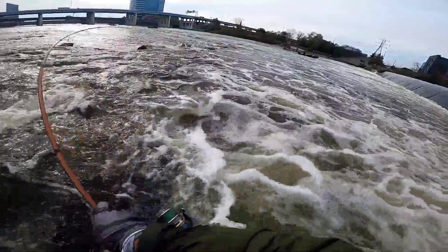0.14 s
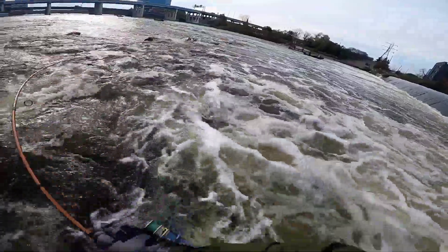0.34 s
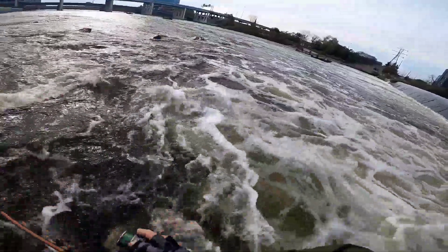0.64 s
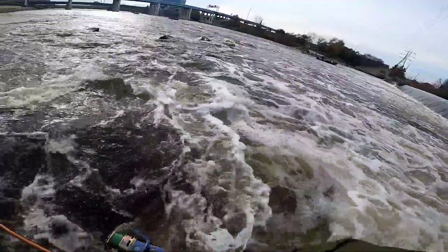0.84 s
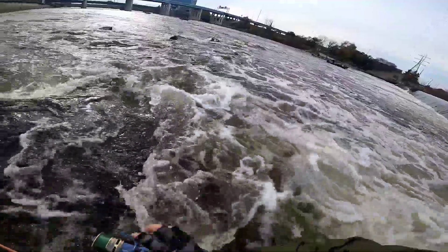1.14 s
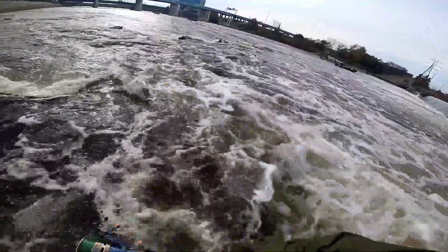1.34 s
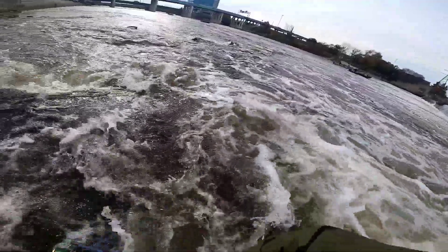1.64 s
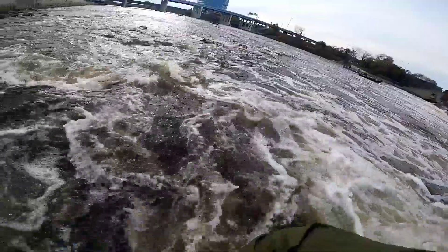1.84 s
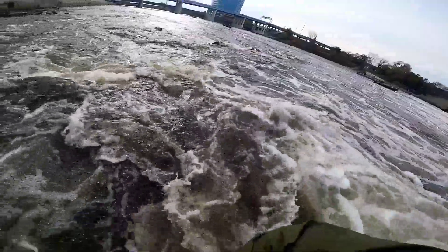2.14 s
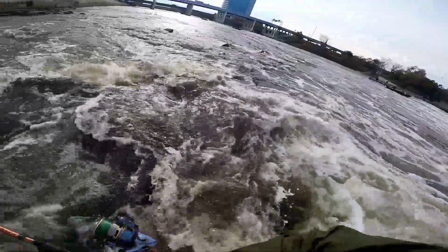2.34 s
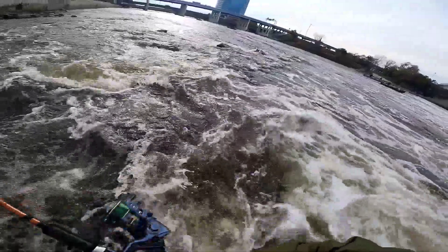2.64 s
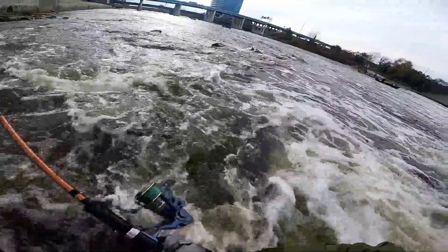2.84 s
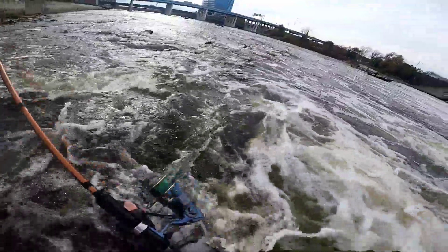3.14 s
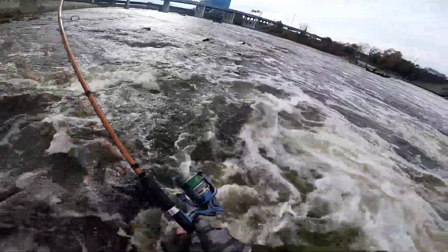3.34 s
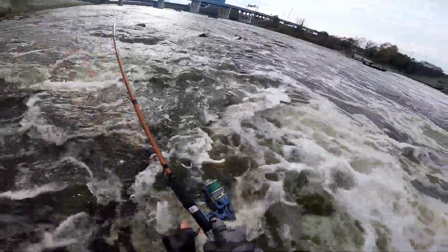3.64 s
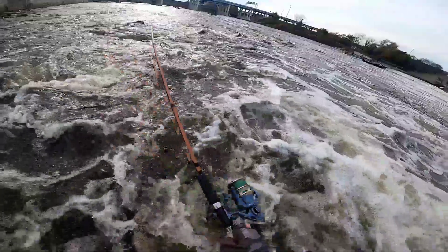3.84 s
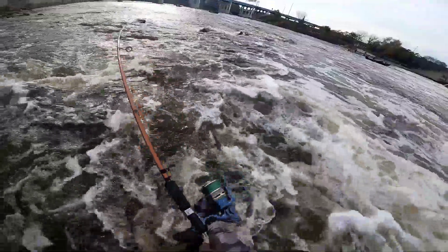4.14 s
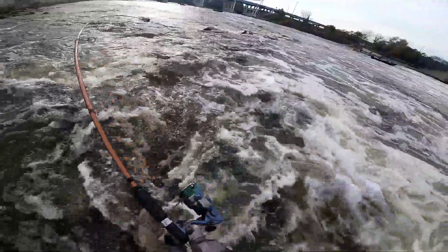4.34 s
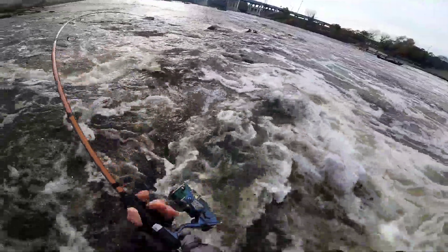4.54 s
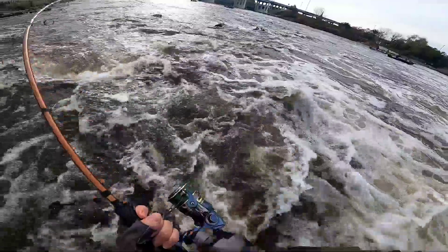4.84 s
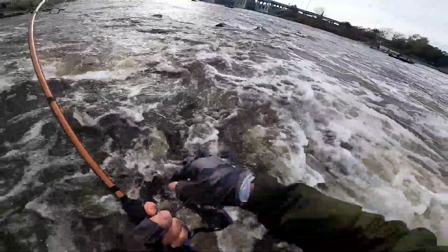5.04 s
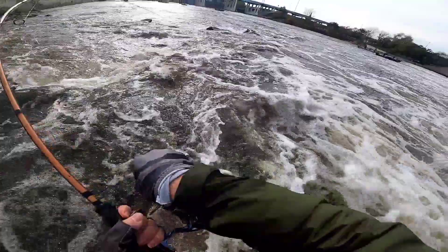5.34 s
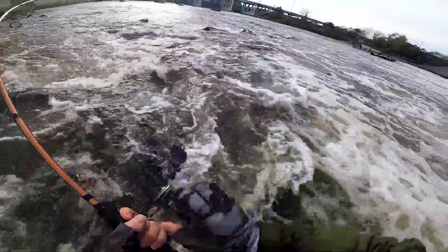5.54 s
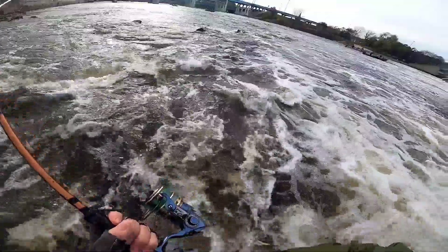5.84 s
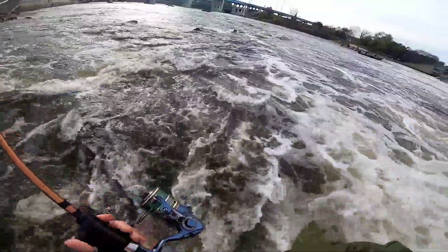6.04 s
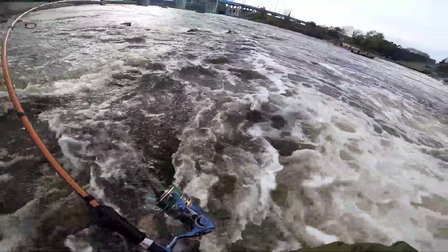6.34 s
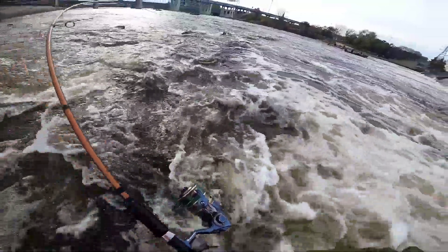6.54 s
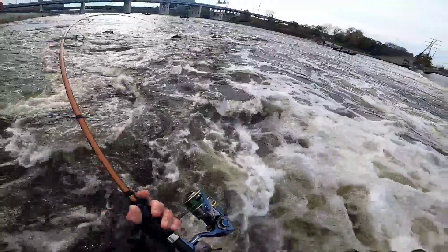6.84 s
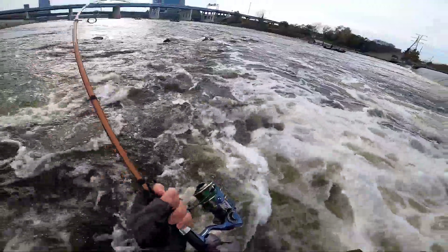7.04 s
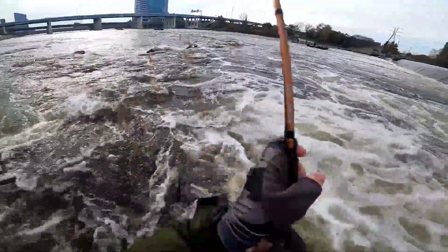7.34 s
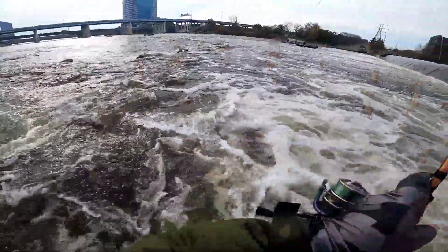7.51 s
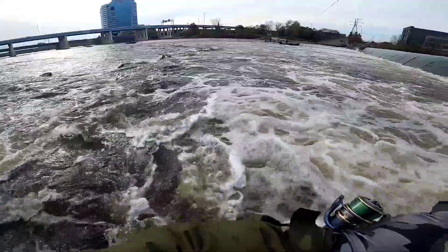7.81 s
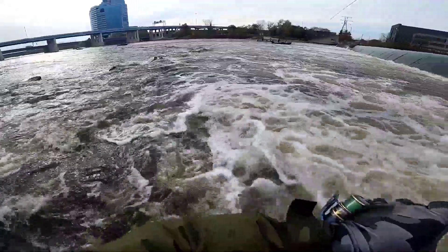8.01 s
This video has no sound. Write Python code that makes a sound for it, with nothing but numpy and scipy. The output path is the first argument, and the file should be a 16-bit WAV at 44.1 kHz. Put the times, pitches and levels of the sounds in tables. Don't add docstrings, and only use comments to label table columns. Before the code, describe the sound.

From the start, whitewater below a low dam roars continuously at a few metres: a dense mid-range rush with a gurgling body, bubbly foam fizz and only faint, dull-edged top treble, wide across two small chest-worn microphone ports. Deep, soft wind shoves bump the housing in the first second. From 1.1 to 1.7 s a cluster of small wet splashes pops close to the feet as the churn swells, then sinks around 2 s; another pop comes at 2.3 s. Between 2.4 and 4.1 s the hardest gusts strike, low thumps and quick fluttering flaps, strongest near 3.5 and 4.0 s, and the river ducks slightly after them. A splash lands at 4.0 s. From 4.2 s the wind drops and the water recovers, surging mildly near 4.8 s. Weaker shoves return around 6.5 to 7.6 s, with tiny splashes at 6.9 and 7.8 s; the rush continues to the end at about 8 s.

```python
import sys
import numpy as np
from scipy import signal
from scipy.fft import rfft, irfft, next_fast_len
from scipy.io import wavfile
from scipy.ndimage import uniform_filter1d, map_coordinates

SR = 44100
rng = np.random.default_rng(int(sys.argv[2]) if len(sys.argv) > 2 else 0)


def volts_from_decibels(level):
    exponent = np.asarray(level, float) / 20
    return 10 ** exponent


def master_out(mix):
    frames = np.transpose(np.atleast_2d(mix))
    ceiling = np.clip(frames, -1, 1)
    pcm = np.round(ceiling * 32767).astype(np.int16)
    wavfile.write(sys.argv[1], SR, pcm)


N = 360297
HZ = np.fft.rfftfreq(next_fast_len(N + 8192), 1 / SR)

# [t/s, level over the usual flow/dB]
SURGE = [(0, -.5), (.4, 0.3), (.8, -1.5), (1.2, 0.9), (1.55, 1.5), (2.1, -1), (2.45, 0.6), (2.95, -1),
         (3.3, -1.5), (3.6, .5), (4.2, -.8), (4.75, 1), (5.1, 0), (6.05, 0.3), (6.45, -0.1), (6.75, 0.3),
         (7.45, -0.3), (8.17, 0)]
# [f/Hz, density/dB]
LEFT_LOW = [(90, 3.5), (110, 0.6), (190, 0.5), (520, -7.5), (820, -11), (900, -6), (1210, 1.9), (1290, 2.1),
            (1810, -6.5), (1960, -13.5), (2170, -18.5), (2390, -14.5)]
RIGHT_LOW = [(90, -2), (110, -1), (190, -2.5), (280, -5), (620, -13.5), (840, -19.5), (930, -12.5),
             (1140, -8), (1340, -1.5), (1660, -6.5), (1920, -12.5), (2390, -32)]
# [f/Hz, density/dB]
LEFT_BRIGHT = [(1920, -13), (2170, -18), (2560, -11.5), (2860, -15), (3080, -10), (3330, -10.8),
               (3550, -14.5), (3960, -9.5), (4310, -21), (4910, -20.5), (5150, -22), (6300, -32),
               (7800, -31), (8980, -46.5)]
RIGHT_BRIGHT = [(1920, -16.5), (2800, -21.5), (3080, -15.5), (3570, -17), (3810, -22), (4350, -16.5),
                (5100, -16.5), (5320, -21.5), (5620, -22), (6830, -34), (7520, -45.5), (8200, -56),
                (8310, -56), (8790, -57)]
# [f/Hz, density/dB]
LEFT_TOP = [(8010, 9), (9020, -2), (11180, -1), (12230, 1), (13000, -5.5), (13600, -14), (15000, -17)]
RIGHT_TOP = [(8010, -11), (10230, -9), (11480, -22), (12170, -16.5), (13260, -14), (15000, -18)]
# [f/Hz, likeness/0-1]
ALIKE_LOW = [(90, .995), (350, .98), (690, .95), (840, .7), (970, .87), (1290, .85), (1400, .72),
             (1700, .88), (1980, .75), (2220, .86), (2390, .78)]
ALIKE_BRIGHT = [(1980, .78), (2580, .83), (2860, .5), (3060, .82), (3400, .82), (3620, .65), (3900, .78),
                (4500, .05), (4950, .6), (5450, .35), (5940, .55), (6160, .03), (6780, .54), (8100, .08)]
# [f/Hz, phase/rad]
LEAD = [(110, .05), (600, .3), (1100, .08), (1680, .6), (2240, 2.4), (2450, 2.0), (2750, 1.9), (2950, .75),
        (3750, 1.9), (3950, 1.55), (4400, 2.5), (6100, 3.4), (6250, .7), (7170, -1.1)]
# [t/s, level/dB]
GUST = [(0, -27), (.33, -36.5), (.7, -30.5), (1.5, -37), (1.9, -29.5), (2.3, -30), (2.72, -24), (3.4, -24),
        (3.68, -29), (3.93, -29), (4.25, -36.5), (4.62, -29.5), (4.87, -38), (5.2, -32.5), (6.2, -33.5),
        (6.75, -35), (7.72, -29), (7.95, -35.5)]
# [t/s, peak level/dB, length/s]
BUFFETS = [(0.16, -23.7, 0.07), (0.48, -27, 0.092), (0.568, -22, 0.065), (0.858, -24.5, 0.07),
           (1.15, -29, 0.093), (1.405, -30, 0.042), (2.043, -27, 0.082), (2.177, -24.5, 0.11),
           (2.413, -19.5, 0.067), (2.53, -33, 0.33), (2.653, -17.9, 0.055), (2.905, -20.0, 0.038),
           (2.998, -24.5, 0.053), (3.17, -32, 0.18), (3.47, -21, 0.05), (3.508, -16.5, 0.081),
           (3.612, -18.5, 0.095), (3.74, -18, 0.036), (3.796, -19, 0.042), (3.855, -20, 0.091),
           (4.007, -17, 0.045), (4.059, -16, 0.066), (4.528, -26, 0.087), (5.076, -29.5, 0.12),
           (6.477, -26.5, 0.09), (6.956, -29, 0.05), (7.07, -24, 0.033), (7.304, -24, 0.055),
           (7.56, -25.5, 0.062), (8.092, -25.5, 0.16)]
# [t/s, peak level/dB, length/s]
FLAPS = [(0.58, -35, 0.071), (0.98, -36.5, 0.08), (1.894, -37, 0.055), (2.39, -34, 0.11), (2.758, -38, 0.1),
         (3.1, -31.2, 0.075), (3.56, -44, 0.05), (3.73, -28, 0.036), (4.052, -27, 0.031),
         (4.495, -40, 0.039), (4.953, -34.5, 0.059), (5.045, -45, 0.052), (6.46, -31.9, 0.064),
         (7.497, -39, 0.05)]
# [f/Hz, density/dB]
BUFFET_COLOUR = [(3, -36), (6, -1), (22, -1), (34, 0), (48, -8), (60, -19.5), (80, -40), (200, -97)]
FLUTTER_COLOUR = [(30, -49), (55, 2), (65, 0), (80, -10), (100, -11.5), (125, -21), (250, -85)]
# [t/s, peak level/dB, centre f/Hz]
POPS = [(1.108, -30, 3140), (1.206, -33, 3110), (1.350, -24, 3500), (1.419, -29, 3110), (1.462, -29, 3850),
        (1.569, -27, 3700), (1.584, -28, 3050), (1.670, -29, 3350), (2.314, -31, 3130), (4.033, -27, 3010),
        (6.948, -32, 3900), (7.788, -33, 3830), (7.807, -31, 3140)]

ROAR_DB, RUSH_DB, FIZZ_DB, MIST_DB = -38, -39, -45, -76.6
ROAR_FOLLOWS, RUSH_FOLLOWS, FIZZ_FOLLOWS, MIST_FOLLOWS = .3, 0.69, 1.4, .9
FLUTTER_DB, FLUTTER_FOLLOWS = -43, .1
DUCK_FROM_DB, DUCK_RATIO = -19, 1.47
DUCK_DELAY_S, DUCK_ATTACK_S, DUCK_RELEASE_S = 0.06, 0.081, 0.36


def unit(x):
    return x / np.sqrt(np.mean(np.atleast_2d(x).mean(0) ** 2) + 1e-20)


def along(points):
    f, v = np.transpose(points)
    return np.interp(np.log(HZ + 1), np.log(f + 1), v)


def curves(rows):
    s, *cols = np.transpose(rows)
    return [np.interp(np.arange(N) / SR, s, c) for c in cols]


def filtered(x, response):
    m = 2 * len(HZ) - 2
    return irfft(rfft(x, m) * response, m)[..., :N]


def above(edge_hz, order=6):
    return 1 - 1 / (1 + (HZ / edge_hz) ** (2 * order))


def band(low_hz, high_hz, low_order=6, high_order=6):
    return np.sqrt(above(low_hz, low_order) * (1 - above(high_hz, high_order)))


def churn(patchy_db):
    z = signal.stft(rng.standard_normal((2, N + 512)), nperseg=512)[2]
    field = uniform_filter1d(rng.standard_normal(z.shape[1:]), size=12, axis=0)
    field = uniform_filter1d(field, size=7, axis=1)
    x = signal.istft(z * volts_from_decibels(patchy_db * field / field.std()), nperseg=512)[1][:, :N]
    return x / x.std()


def bubble(hz, cycles, length=256):
    u = np.arange(length) / SR * hz[:, None] / cycles
    ring = np.sin(2 * np.pi * cycles * (u + 0.078 * u ** 2))
    return ring * np.exp(-2.2 * u) * (1 - np.exp(-12 * u))


def scatter(starts, rows):
    at = starts.astype(int)[:, None] + np.arange(rows.shape[1])
    return np.bincount(at.ravel(), rows.ravel(), N + rows.shape[1])[:N]


def foam(low_hz, high_hz, cycles, spread_db, count):
    when, pitch, size = rng.random((2 * count, 3)).T
    rows = bubble(low_hz * (high_hz / low_hz) ** pitch, cycles, length=430)
    rows = rows * volts_from_decibels(-spread_db * np.log(size + 1e-4))[:, None]
    return np.array([unit(scatter(when[k::2] * (N - 1), rows[k::2])) for k in range(2)])


def spatter(depth_db, rate):
    knots = rng.standard_normal(int(N * rate / SR) + 4)
    return volts_from_decibels(depth_db * map_coordinates(knots, [np.arange(N) * rate / SR]))


def ports(pair, left, right, alike):
    turn = np.arccos(np.clip(along(alike), 0, 1)) / 2
    shared, apart = filtered(pair, np.array([np.cos(turn), np.sin(turn)]))
    lag = np.exp(.5j * along(LEAD))
    colours = np.array([volts_from_decibels(along(left)) / lag, volts_from_decibels(along(right)) * lag])
    return filtered(np.array([shared + apart, shared - apart]), colours)


def river():
    surge_db, = curves(SURGE)
    gurgle = volts_from_decibels(-18.5) * foam(706, 2107, cycles=11.2, spread_db=1.5, count=2500)
    body = ports(churn(patchy_db=.5) + gurgle, LEFT_LOW, RIGHT_LOW, ALIKE_LOW)
    bubbles = volts_from_decibels(-10.0) * foam(1460, 9040, cycles=4.8, spread_db=1.75, count=7000)
    spray = spatter(depth_db=0.58, rate=24)
    bright = ports(spray * churn(patchy_db=0.8) + bubbles, LEFT_BRIGHT, RIGHT_BRIGHT, ALIKE_BRIGHT)
    top = ports(spray * churn(patchy_db=1.5), LEFT_TOP, RIGHT_TOP, ALIKE_BRIGHT)

    roar = unit(filtered(body, band(88.0, 790, low_order=4)))
    rush = unit(filtered(body, band(880, 2640)))
    fizz = unit(filtered(bright, band(2160, 8500, high_order=20)))
    mist = unit(filtered(top, np.sqrt(above(8620, order=20))))
    low = volts_from_decibels(ROAR_DB + ROAR_FOLLOWS * surge_db) * roar + volts_from_decibels(RUSH_DB + RUSH_FOLLOWS * surge_db) * rush
    high = volts_from_decibels(FIZZ_DB + FIZZ_FOLLOWS * surge_db) * fizz + volts_from_decibels(MIST_DB + MIST_FOLLOWS * surge_db) * mist
    return low + high


def swells(base_db, events, narrow):
    t, power = np.arange(N) / SR, volts_from_decibels(2 * base_db)
    for s, db, length in events:
        near = slice(max(round((s - 2 * length) * SR), 0), round((s + 2 * length) * SR))
        power[near] += volts_from_decibels(2 * db) * np.exp(-((t[near] - s) * narrow / length) ** 2)
    return 10 * np.log10(power)


def eddies(spectrum, level_db, steady):
    push, own = filtered(rng.standard_normal((2, N)), volts_from_decibels(along(spectrum)))
    swell = np.sqrt(np.abs(uniform_filter1d(push ** 2, size=4000))) / push.std()
    push = unit(push / (swell + 0.16) ** steady)
    own = volts_from_decibels(-35) * unit(own)
    return volts_from_decibels(level_db) * np.array([volts_from_decibels(2.0) * (push + own), volts_from_decibels(-1.1) * (push - own)])


def wind():
    gust_db, = curves(GUST)
    buffet_db = swells(gust_db, BUFFETS, narrow=2.93)
    flutter_db = swells(FLUTTER_DB + FLUTTER_FOLLOWS * (gust_db - gust_db.mean()), FLAPS, narrow=2.9)
    buffet = eddies(BUFFET_COLOUR, buffet_db, steady=.75)
    return buffet + eddies(FLUTTER_COLOUR, flutter_db - .6, steady=.6)


def pops():
    s, db, hz = np.repeat(POPS, 6, axis=0).T
    late, spread = rng.random((len(s), 2)).T
    rows = bubble(hz * 1.5 ** (spread - .4), cycles=7) * volts_from_decibels(db - 6)[:, None]
    track = scatter((s - .002 + 0.004 * late) * SR, rows)
    track = filtered(track, np.sqrt(1 - above(5200)))
    return np.array([volts_from_decibels(2) * track, volts_from_decibels(-2) * np.roll(track, shift=-4)])


def ducking():
    s, db, _ = np.transpose(BUFFETS)
    coarse = np.arange(0, N, 64)
    since = np.clip(coarse / SR - s[:, None] - DUCK_DELAY_S, 0, None)
    shape = np.exp(-since / DUCK_RELEASE_S) - np.exp(-since / DUCK_ATTACK_S)
    lost_db = DUCK_RATIO * np.clip(db - DUCK_FROM_DB, 0, None) @ shape
    return -np.interp(np.arange(N), coarse, lost_db)


def scene():
    return volts_from_decibels(ducking()) * river() + wind() + pops()


def starved(x, floor_db, wander_db, lead_in=41):
    frame = dict(window="cosine", nperseg=2048, noverlap=1024)
    z = signal.stft(np.pad(x, ((0, 0), (lead_in, 0)), "edge"), **frame)[2]
    bands = z[:, :1024].reshape(2, 64, 16, -1)
    level_db = 10 * np.log10(np.mean(np.abs(bands) ** 2, axis=2) + 1e-20)
    mood = uniform_filter1d(rng.standard_normal(level_db.shape), size=8, axis=1)
    mood = uniform_filter1d(mood, size=2, axis=2)
    floor = np.reshape(floor_db, (2, 1, 1)) + np.reshape(wander_db, (2, 1, 1)) * mood / mood.std()
    z[:, :1024] *= np.repeat(level_db > floor, 16, axis=1)
    return signal.istft(z, **frame)[1][:, lead_in:N + lead_in]


def roll_off(x):
    return signal.sosfilt(signal.butter(12, 14800, fs=SR, output="sos"), x)


def record(dry):
    held = dry / (1 + np.abs(dry / .47) ** 4) ** (1 / 4)
    mix = starved(held, floor_db=[-106.3, -107.5], wander_db=[3.6, 3.5])
    return roll_off(mix)


dry = scene()
out = record(dry)
master_out(out)
```